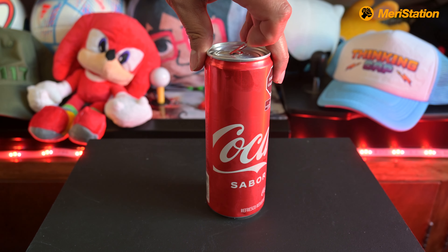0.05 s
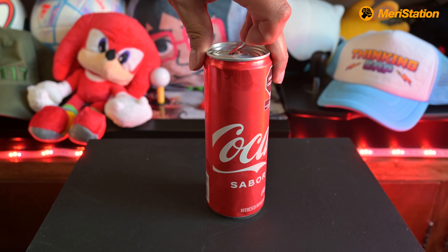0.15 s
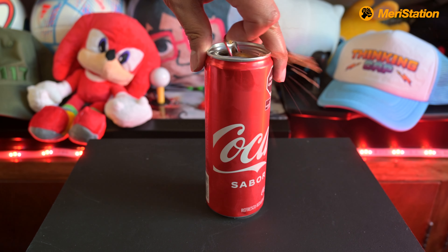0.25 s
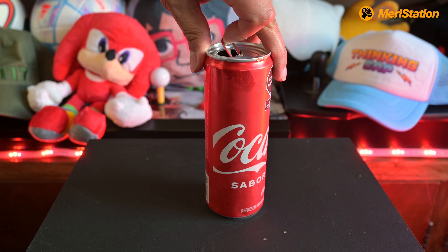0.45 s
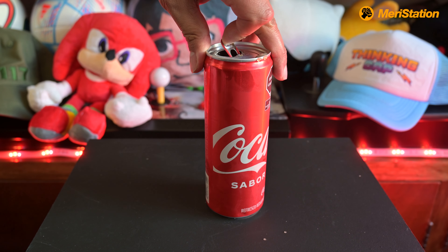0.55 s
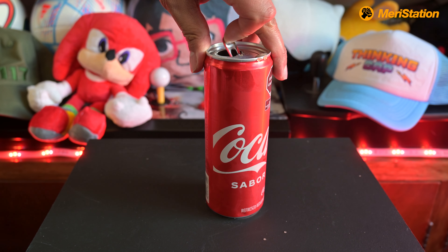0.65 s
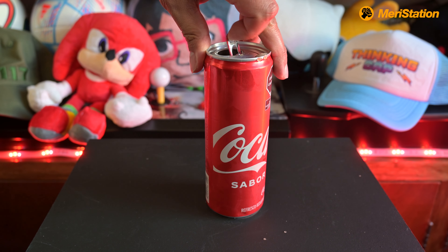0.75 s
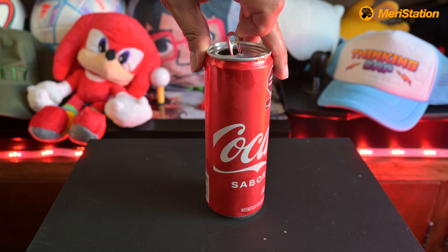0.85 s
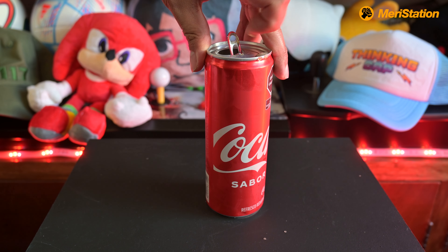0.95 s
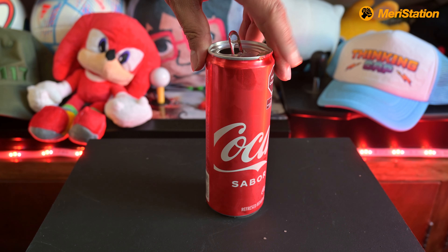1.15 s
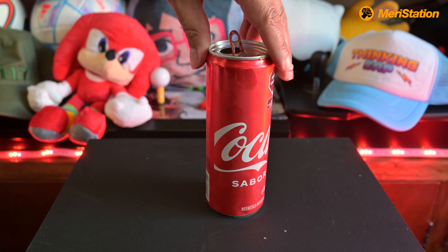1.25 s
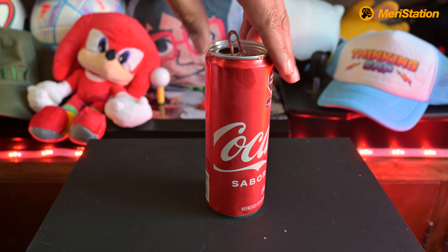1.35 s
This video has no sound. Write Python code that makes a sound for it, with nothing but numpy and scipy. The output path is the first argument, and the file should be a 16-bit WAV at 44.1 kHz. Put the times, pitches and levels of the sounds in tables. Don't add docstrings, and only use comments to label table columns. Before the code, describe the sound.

Soda can opening, close and dry: small ticks, loud metal tearing and a bright fluttering hiss that fades fast, soft low can hums, then tab snaps with a little spray, gentle foam fizz, and clattering on a table.

```python
import sys
import numpy as np
from scipy import signal
from scipy.fft import rfft, irfft, next_fast_len
from scipy.io import wavfile
from scipy.ndimage import uniform_filter1d, map_coordinates

SR = 44100
rng = np.random.default_rng(int(sys.argv[2]) if len(sys.argv) > 2 else 0)


def bounce(signal):
    frames = np.transpose(np.atleast_2d(signal))
    limited = np.clip(frames, -1, 1)
    pcm = np.round(limited * 32767).astype(np.int16)
    wavfile.write(sys.argv[1], SR, pcm)


def gain_from_decibels(decibels):
    exponent = np.asarray(decibels, float) / 20
    return 10 ** exponent


N = 61739


def unit(x):
    return x / np.sqrt(np.mean(x ** 2) + 1e-20)


def along(points, hz):
    f, v = np.transpose(points)
    return np.interp(np.log(hz + 1), np.log(f + 1), v)


def level(rows):
    s, db = np.transpose(rows)
    return gain_from_decibels(np.interp(np.arange(N) / SR, s, db, left=-120, right=-120))


def wobble(rate):
    knots = rng.standard_normal(int(N * rate / SR) + 4)
    return 2 * np.tanh(map_coordinates(knots, [np.arange(N) * rate / SR]) / 2)


def filtered(x, response):
    m = next_fast_len(N + SR // 2)
    return irfft(rfft(x, m) * response(np.fft.rfftfreq(m, 1 / SR)), m)[..., :N]


def resonances(peaks, f):
    total = 0
    for k, (c, w, db) in enumerate(peaks):
        total = total + (-1) ** k * gain_from_decibels(db) * 1j * f * w / (c * c - f * f + 1j * f * w)
    return total


def voiced(x, spectrum, peaks, lift_db, widen):
    def response(f):
        bumps = sum(max(db, 1) / (1 + ((f - c) / (widen * w)) ** 2) for c, w, db in peaks)
        return gain_from_decibels(along(spectrum, f) + lift_db * bumps)

    return unit(filtered(x, response))


def add(track, s, piece):
    part = track[round(s * SR):][:len(piece)]
    part += piece[:len(part)]


def burst(s, db, t60, peaks, lumpy_db, rate):
    t = np.arange(N) / SR - s
    lumpy = gain_from_decibels(lumpy_db * wobble(rate)) * rng.standard_normal(N)
    spray = unit(filtered(lumpy, lambda f: resonances(peaks, f)))
    return gain_from_decibels(db - 60 * np.maximum(t, 0) / t60) * (t > 0) * spray


def seal():
    # start in seconds, length in seconds, level in dB,
    # brightest pitch in Hz, release t60 in seconds.
    tears = [
        (.2336, .0012, -2, 5350, .004),
        (.2348, .0035, -15, 5200, .009),
        (.2388, .0031, -2, 5200, .004),
        (.2442, .006, -22, 5200, .009),
        (.2506, .0018, -5, 8700, .004),
        (.2524, .0022, -4, 4900, .004),
        (.2546, .0022, -1, 3050, .008),
        (.2568, .0011, -4, 3900, .006),
        (.2594, .0012, -8, 2900, .01),
    ]
    # frequency in Hz, density in dB per Hz.
    tear_colour = [(88, -52), (150, -30), (1480, -6), (1940, -10), (2980, -7), (4140, -13.5), (5030, -10),
                   (13300, -10.5), (15500, -14.5)]
    ping_db, ping_t60_s = -3, 0.014
    out, t = np.zeros(N), np.arange(SR // 10) / SR
    for s, length, db, hz, t60 in tears:
        def colour(f):
            return gain_from_decibels(along(tear_colour, f)) * (1 + 2.8 / (1 + ((f - hz) / 1200) ** 2))

        noise = filtered(rng.standard_normal(N), colour)[:len(t)]
        held = noise / np.std(noise[:round(length * SR) + 20])
        after = np.maximum(t - length, 0)
        phase = 2 * np.pi * hz * t + .5 * wobble(830)[:len(t)]
        ping = gain_from_decibels(ping_db - 60 * after / ping_t60_s) * np.sin(phase)
        attack = np.minimum(t / 0.00028, 1)
        add(out, s, gain_from_decibels(db) * attack * (gain_from_decibels(-60 * after / t60) * held + ping))
    lid_ring = [(5200, 250, -2)]  # Hz, width Hz, dB
    return filtered(out, lambda f: (1j * f / (500 + 1j * f)) ** 3 + resonances(lid_ring, f))


def gas():
    # time in seconds, level in dB.
    rush = [
        (0.26, -7),
        (0.268, -13.5),
        (0.408, -24.5),
        (0.594, -49),
        (0.66, -77),
    ]
    # frequency in Hz, density in dB per Hz.
    jet_colour = [(88, -42), (150, -27), (230, -24), (811, -18.5), (1200, -9), (2180, -13), (2980, -5),
                  (4300, -6), (15500, -21.5)]
    # frequency in Hz, width in Hz, lift in dB.
    mouth = [(1200, 150, 5), (2550, 120, 3), (3030, 180, 5), (4290, 60, 6), (4410, 110, 9), (6000, 110, 4),
             (7400, 180, 5)]
    dulls_db_per_s, turn_hz = 81, 8600
    jet = voiced(rng.standard_normal(N), jet_colour, mouth, lift_db=.95, widen=1.0)
    treble = filtered(jet, lambda f: 1 / (1 + (turn_hz / (f + 1)) ** 4))
    fade = gain_from_decibels(-dulls_db_per_s * (np.arange(N) / SR - 0.3019))
    flutter = gain_from_decibels(0.28 * wobble(51.7) + 0.76 * wobble(250))
    return level(rush) * flutter * (jet + (fade - 1) * treble)


def vent():
    # frequency in Hz, density in dB per Hz.
    vent_colour = [(600, -43), (1300, -14), (2000, -3), (2600, -9.5), (3300, -18.5), (4600, -5.5),
                   (5500, -1), (15500, -31)]
    # frequency in Hz, width in Hz, lift in dB.
    slot = [(1850, 120, 3), (2255, 100, 5.5), (4000, 135, 10), (5470, 280, 3), (7350, 100, 1),
            (9160, 130, 6), (10600, 77, 6)]
    start_db, fall_db_per_s = -32.5, 133
    noise = voiced(rng.standard_normal(N), vent_colour, slot, lift_db=1.5, widen=1.0)
    return gain_from_decibels(start_db - fall_db_per_s * np.arange(N) / SR + 0.86 * wobble(167)) * noise


def ticks():
    # start in seconds, ring level in
    # dB, ring pitch in Hz, ring t60 in seconds, snap level in dB.
    tab_ticks = [(0.1288, -30.5, 2370, 0.0074, -34), (0.1286, -38, 3860, .025, -60),
                 (.1288, -45, 8700, .012, -60), (0.1407, -35, 2600, 0.0043, -21),
                 (0.1401, -38, 3800, .018, -60), (0.1407, -34, 5260, 0.008, -60),
                 (.1406, -43, 8600, .008, -60), (.223, -38, 5150, 0.023, -55), (.2338, -9, 7900, .012, -60),
                 (.2405, -4, 13200, .005, -60), (0.7507, -22.5, 1400, 0.013, -40),
                 (.7502, -25, 2900, 0.0091, -44), (0.7699, -11.5, 2680, 0.0023, -11),
                 (0.7695, -18, 9460, 0.0044, -60), (0.77, -20.5, 6350, .004, -60),
                 (0.7708, -27, 3200, 0.018, -50), (.7763, -15.5, 4400, 0.0026, -28),
                 (0.785, -20, 3000, 0.0039, -39), (0.7856, -24, 4170, .005, -40),
                 (.7865, -24, 2200, 0.0049, -39), (0.788, -23, 3670, .006, -40),
                 (0.8123, -14.5, 1330, 0.0071, -30), (.8271, -14.5, 2880, .025, -40),
                 (.8271, -24, 1330, .02, -38), (.8297, -12, 2950, .016, -34),
                 (0.976, -26.5, 5530, 0.0073, -36), (1.0281, -17, 8500, 0.0037, -50),
                 (1.0284, -30, 13300, .004, -60), (1.0292, -31, 935, 0.013, -36),
                 (1.16, -28, 3800, 0.01, -46), (1.3533, -12, 12000, .003, -40),
                 (1.3533, -13, 14200, .0025, -60), (1.3534, -19, 8000, .006, -60),
                 (1.3534, -14, 2750, .012, -30), (1.355, -24, 3050, .035, -60),
                 (1.3729, -21, 850, 0.025, -30), (1.3758, -24, 1500, 0.012, -40),
                 (1.38, -27, 1150, 0.014, -38), (1.3932, -32, 8700, .004, -36)]
    snap_body = [(3000, 7800, 0)]  # Hz, width Hz, dB
    out, snaps, t = np.zeros(N), np.zeros(N), np.arange(SR // 6) / SR
    for s, db, hz, t60, snap_db in tab_ticks:
        rough = 1 + .5 * uniform_filter1d(rng.standard_normal(len(t)), size=6)
        add(snaps, s, gain_from_decibels(snap_db - 7 - 60 * t / 0.00055))
        add(out, s, gain_from_decibels(db - 60 * t / t60) * rough * np.sin(2 * np.pi * hz * t))
    return out + filtered(snaps, lambda f: resonances(snap_body, f) ** 2)


def knocks():
    # start in seconds, level in dB, pitch in Hz, t60 in seconds.
    table_knocks = [(0.2543, -20, 276.3, 0.11), (.262, -28.5, 197, 0.27), (.257, -12.5, 1150, 0.041),
                    (.387, -38.5, 324, 0.1), (0.409, -41, 457, 0.051), (.428, -40.5, 530, 0.074),
                    (.43, -30.5, 312, 0.055), (.474, -34, 382, 0.066), (.476, -37, 310, 0.12),
                    (.474, -38.5, 574, 0.046), (.742, -39, 254, 0.14), (.770, -26, 442, 0.035),
                    (1.032, -37, 318, 0.038), (1.029, -39, 630, 0.012), (1.171, -43, 277, .05),
                    (1.194, -47, 420, .04), (1.356, -15, 207, 0.0092), (1.361, -26.5, 334, 0.041),
                    (1.377, -11.5, 285, 0.021), (1.378, -27.5, 540, 0.056), (1.3857, -21.5, 387, 0.031),
                    (1.3925, -21.5, 323, 0.02)]
    out, t = np.zeros(N), np.arange(SR // 6) / SR
    for s, db, hz, t60 in table_knocks:
        soft_start = 1 - np.exp(-t / 0.00054)
        add(out, s, gain_from_decibels(db - 60 * t / t60) * soft_start * np.sin(2 * np.pi * hz * t))
    return out


def creak():
    # frequency in Hz, width in Hz, level in dB.
    hinge = [(700, 400, -8), (1280, 500, -1.5), (2900, 600, 0), (5640, 800, -20)]
    from_s, to_s, creak_db, swell_db, slips_per_s = .8075, .8275, -28, 3, 2500
    share = (np.arange(N) / SR - from_s) / (to_s - from_s)
    on = (share > 0) * (share < 1)
    slips = (rng.random(N) < slips_per_s / SR) * rng.uniform(-1, 1, N)
    scrape = 0.061 * rng.standard_normal(N)
    rasp = filtered((slips + scrape) * on, lambda f: resonances(hinge, f) ** 2)
    return gain_from_decibels(creak_db + swell_db * np.clip(share, 0, 1) ** 3) * unit(rasp) * np.sqrt(on.mean())


def splash():
    return burst(.7695, -28, .2, [(3270, 3000, 6), (1500, 830, 0)], lumpy_db=3.5, rate=900)


def rattle():
    return burst(1.373, -37.5, 0.19, [(505, 340, -12), (1400, 700, -4)], lumpy_db=-3, rate=340)


def foam():
    # time in seconds, level in dB.
    foam_level = [(.3, -27.5), (.5, -45), (.7, -44), (.8, -36), (.92, -39.5), (1.1, -36), (1.25, -37.5),
                  (1.4, -36)]
    # frequency in Hz, density in dB per Hz.
    fizz = [(700, -50), (1150, -5), (1900, -12), (2500, -4), (8600, -7.5), (10200, -23), (13500, -13),
            (15500, -28)]
    # frequency in Hz, width in Hz, lift in dB.
    headspace = [(1150, 57, 4), (3000, 51, 3), (3800, 65, 5.5), (5720, 250, 5), (7280, 100, 4.5),
                 (9000, 190, 3.5)]
    bubble_count = 2500
    at, size, pitch = rng.random((bubble_count, 3)).T
    hz, k = 1500 * 7 ** pitch[:, None], np.arange(64)
    strength = gain_from_decibels(-3.5 * np.log(size + 0.06))[:, None]
    grains = strength * np.sin(2 * np.pi * hz * k / SR) * np.exp(-k * hz / SR / 3.4)
    places = (at * N).astype(int)[:, None] + k
    pops = np.bincount(places.ravel(), grains.ravel(), N + 64)[:N]
    bright = filtered(pops, lambda f: 1 + f / 4000)
    hiss = gain_from_decibels(1.7 * wobble(220)) * rng.standard_normal(N)
    mix = 0.54 * unit(bright) + hiss
    return level(foam_level) * gain_from_decibels(wobble(29.65)) * voiced(mix, fizz, headspace, lift_db=1, widen=0.78)


def mist():
    from_s, mist_db, mist_hz = 0.46, -51, 7950
    hiss = filtered(rng.standard_normal(N), lambda f: (f / mist_hz) ** 2 / (1 + (f / mist_hz) ** 3))
    return gain_from_decibels(mist_db) * (np.arange(N) > from_s * SR) * unit(hiss)


def sway():
    # time in seconds, level in dB.
    drone_level = [(.27, -54), (.4, -47), (.6, -52), (.75, -57.5), (.9, -72)]
    # start in seconds, length in seconds, from Hz, to Hz, level in dB.
    swells = [
        (.385, 0.074, 224, 253, -37.5),
        (0.461, 0.046, 254.5, 247, -44.5),
        (.512, 0.09, 225.5, 256.4, -42.5),
        (0.618, 0.12, 237, 226.5, -50),
        (.84, 0.04, 237, 245, -50),
    ]
    drone_peak, overtone_db = [(163, 60, 0)], -12.5
    drone = filtered(rng.standard_normal(N), lambda f: resonances(drone_peak, f))
    out = level(drone_level) * unit(drone)
    for s, length, from_hz, to_hz, db in swells:
        u = np.linspace(0, 1, round(length * SR))
        phase = 2 * np.pi * np.cumsum(from_hz + (to_hz - from_hz) * u ** 1.38) / SR
        hum = np.sin(phase) + gain_from_decibels(overtone_db) * u * np.sin(2 * phase)
        add(out, s, gain_from_decibels(db) * np.sin(np.pi * u) ** 0.26 * hum)
    return gain_from_decibels(2.1 * wobble(41.2)) * out


def room(x):
    # frequency in Hz, t60 in seconds.
    room_t60 = [(200, 0.75), (1500, 0.13), (5000, 0.041), (14000, 0.033)]
    hz, t, z = signal.stft(rng.standard_normal(SR // 2), SR, nperseg=256)
    tail = signal.istft(z * gain_from_decibels(-60 * t / along(room_t60, hz)[:, None]), SR, nperseg=256)[1]
    return signal.fftconvolve(np.pad(x, (200, 0)), tail / np.linalg.norm(tail))[:N]


def background():
    # frequency in Hz, density in dB per Hz.
    floor_colour = [(30, -9), (200, -5), (500, -6.5), (900, -8.5), (1800, -9.5), (2800, -16.5), (6000, -25),
                    (15500, -24.5)]
    # time in seconds, level in dB.
    floor_level = [(0, -54.5), (.22, -48), (.4, -52.5), (.9, -49), (1.4, -48)]
    s, db = np.transpose(floor_level)
    noise = filtered(rng.standard_normal((2, N)), lambda f: gain_from_decibels(along(floor_colour, f)))
    return gain_from_decibels(np.interp(np.arange(N) / SR, s, db)) * unit(noise)


def microphone_hiss():
    hiss_db, hiss_hz = -53.5, 6700
    return gain_from_decibels(hiss_db) * filtered(rng.standard_normal(N), lambda f: f ** 2 / (f ** 2 + hiss_hz ** 2))


def scene():
    near = ticks() + knocks() + creak() + splash() + rattle()
    floor, across = background()
    mid = near + gain_from_decibels(-19) * room(near)
    mid = mid + seal() + gas() + vent() + foam() + mist() + sway() + floor

    def spread(f):
        return 0.26 * 1j * f ** 2 / (f ** 2 + 9000 ** 2) + .06j / (1 + (f / 1000) ** 4)

    diffuse = gain_from_decibels(-14.5) * filtered(across, lambda f: 1 / (1 + (f / 1300) ** 4))
    side = filtered(mid, spread) + microphone_hiss() + diffuse
    return np.array([mid + side, mid - side])


def roll_off(x):
    return signal.sosfilt(signal.butter(12, 15640, fs=SR, output="sos"), x)


def record(dry):
    low_cut_hz, clip_top, output_cut_hz, rumble_db = 140, 1.02, 90, -68.5
    cut = filtered(dry, lambda f: (1j * f / (low_cut_hz + 1j * f)) ** 2)
    clipped = cut / (1 + np.abs(cut / clip_top) ** 16) ** (1 / 16)
    mix = filtered(clipped, lambda f: (1j * f / (output_cut_hz + 1j * f)) ** 2)
    rumble = filtered(rng.standard_normal(dry.shape), lambda f: 1 / (1 + (f / 60) ** 2))
    return roll_off(mix + gain_from_decibels(rumble_db) * unit(rumble))


dry = scene()
out = record(dry)
bounce(out)
```